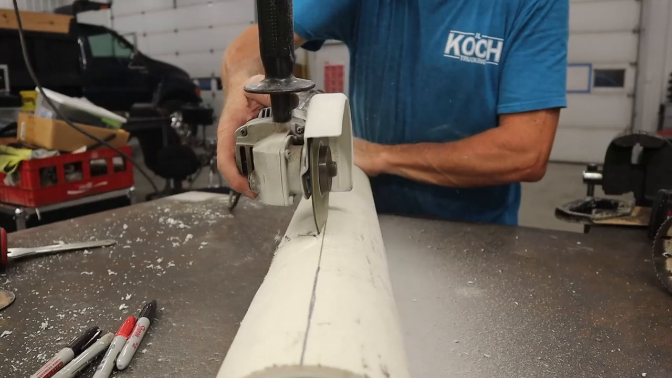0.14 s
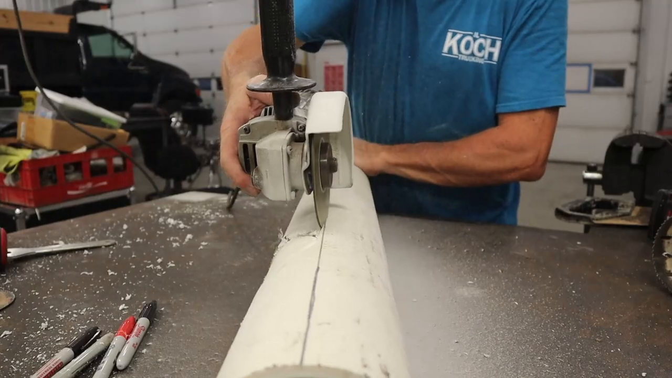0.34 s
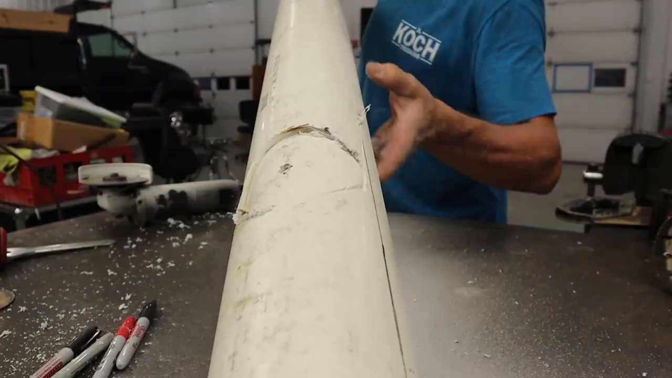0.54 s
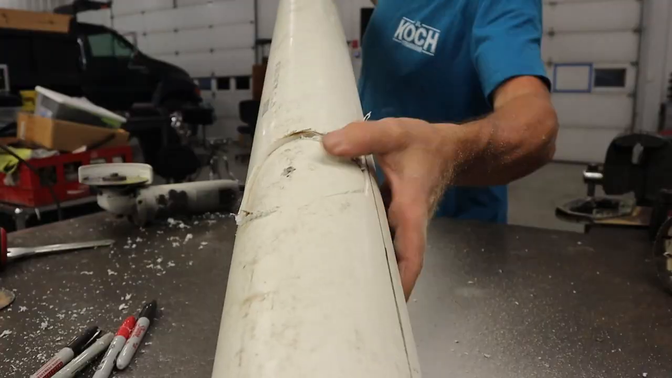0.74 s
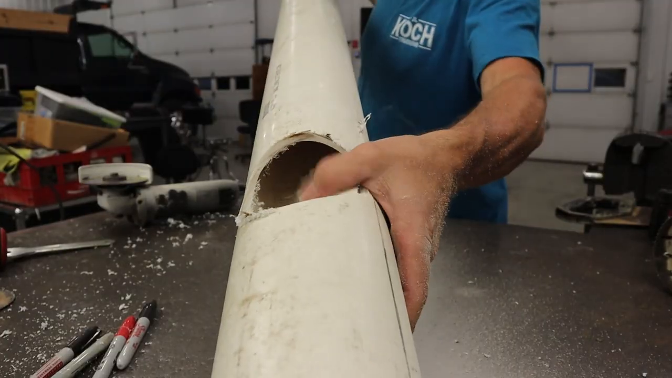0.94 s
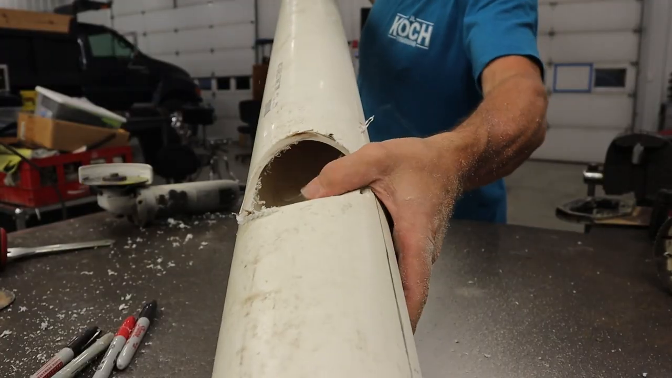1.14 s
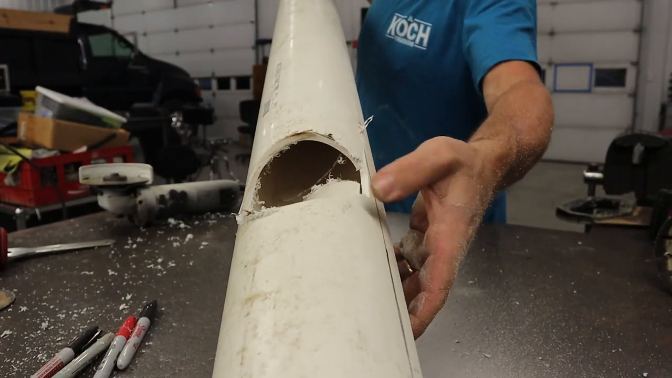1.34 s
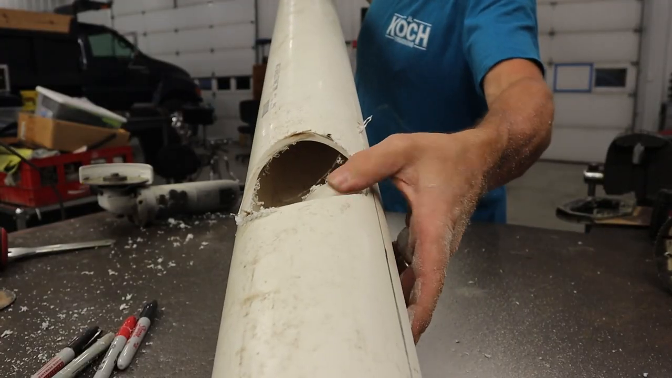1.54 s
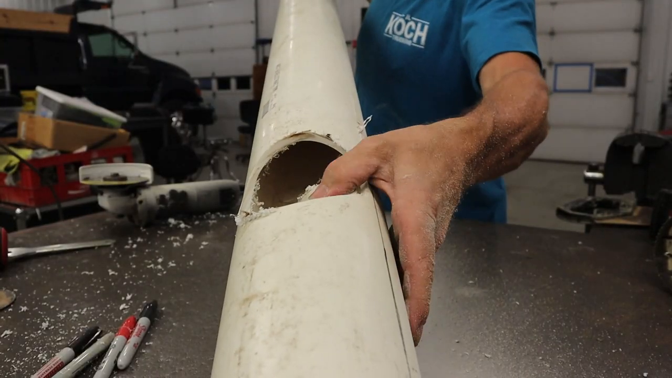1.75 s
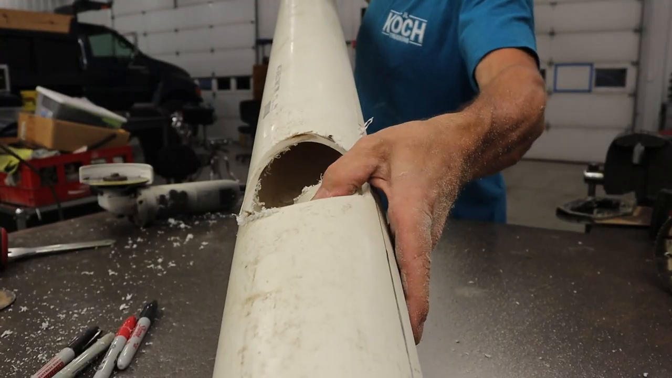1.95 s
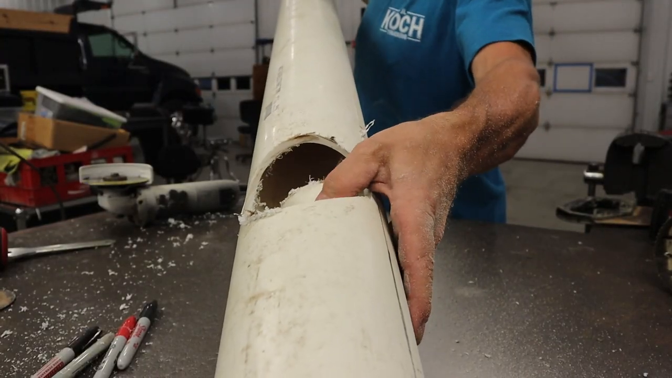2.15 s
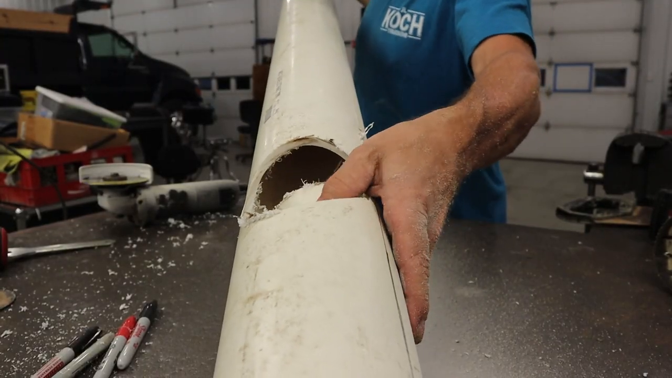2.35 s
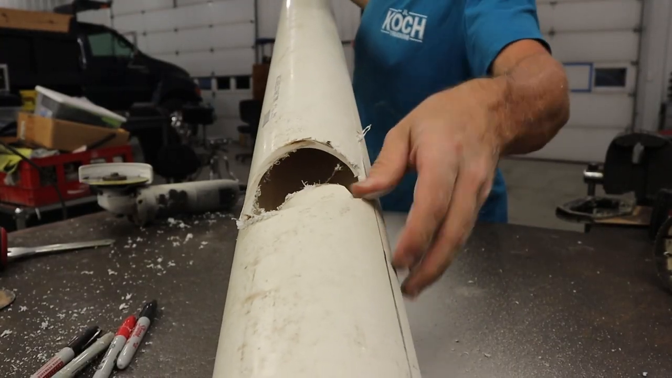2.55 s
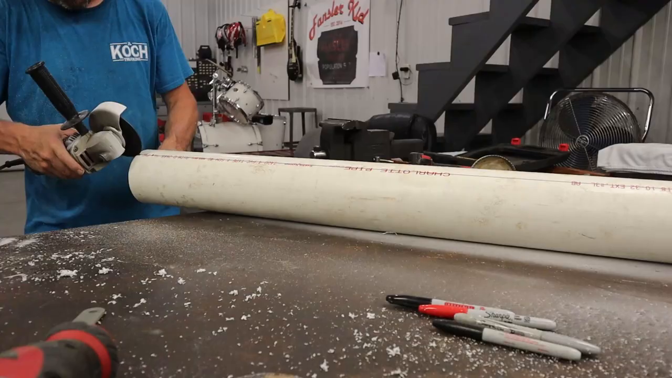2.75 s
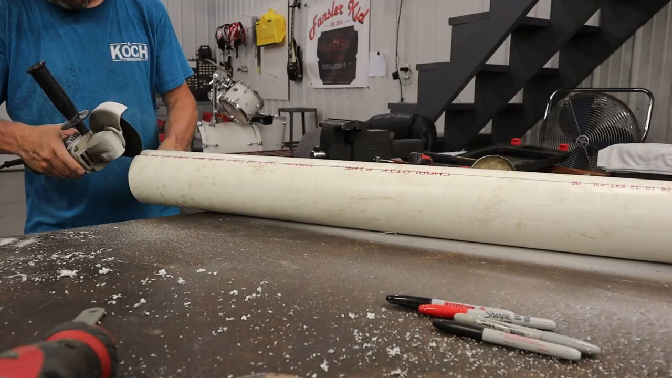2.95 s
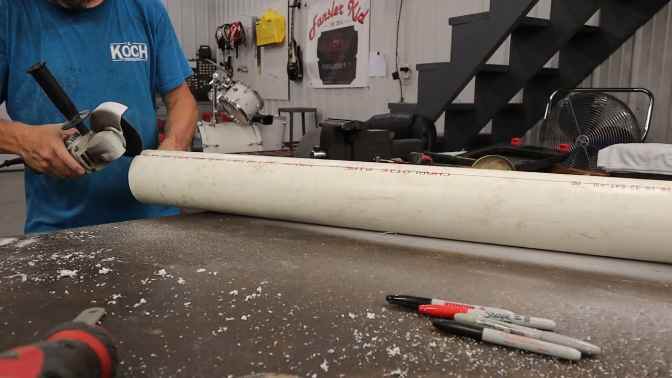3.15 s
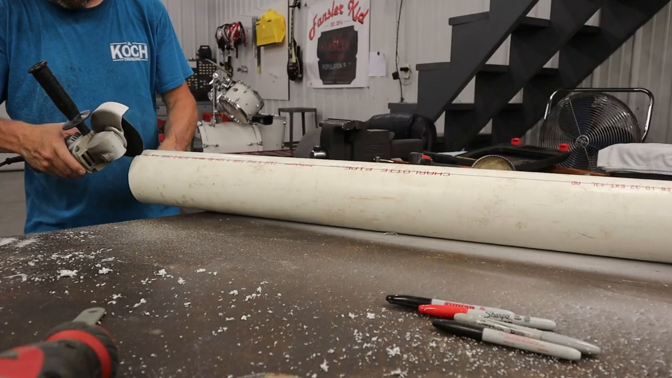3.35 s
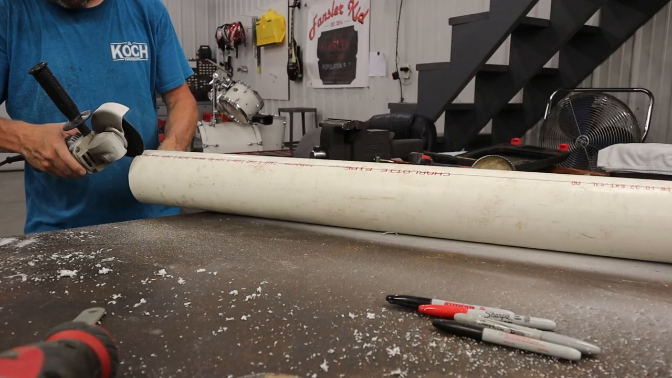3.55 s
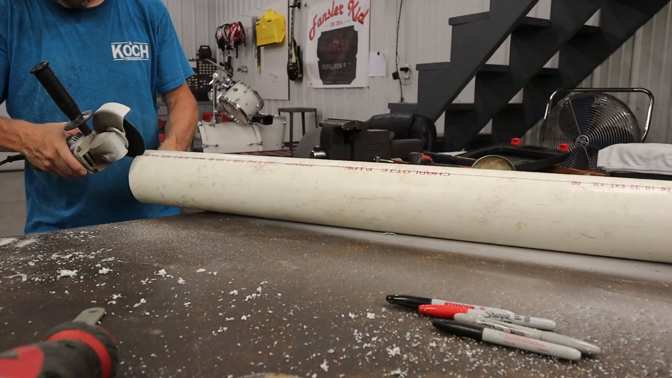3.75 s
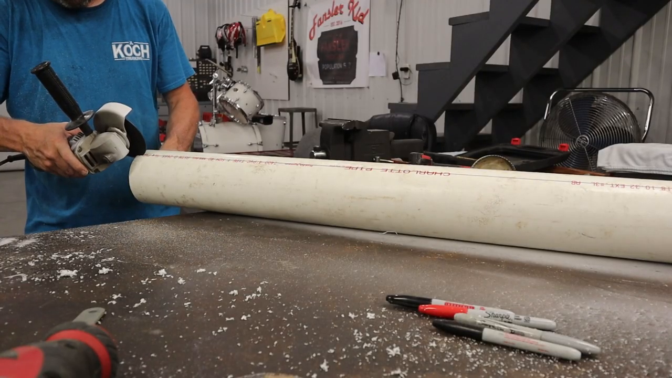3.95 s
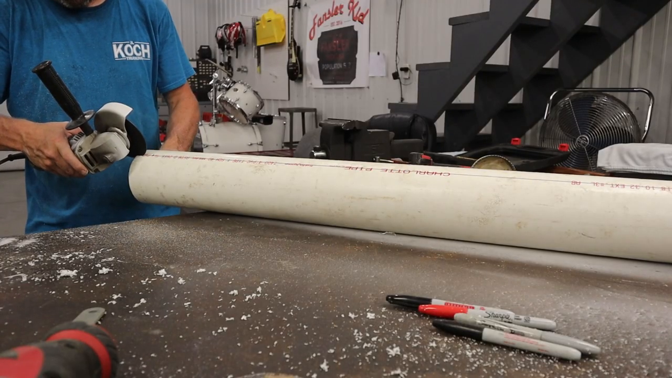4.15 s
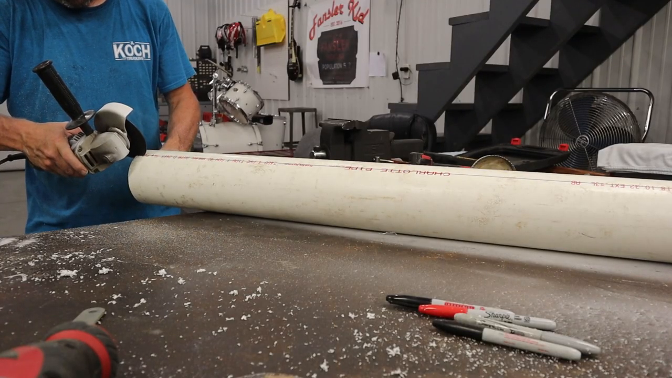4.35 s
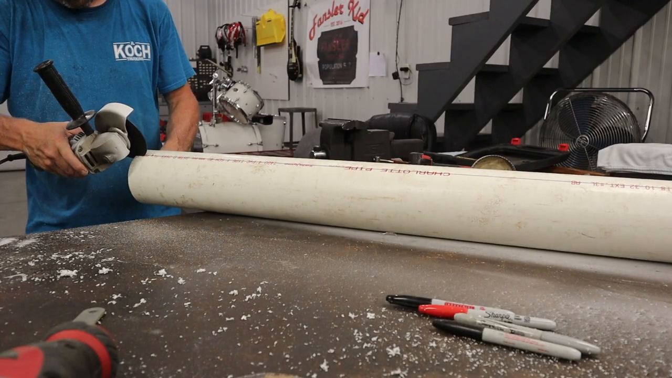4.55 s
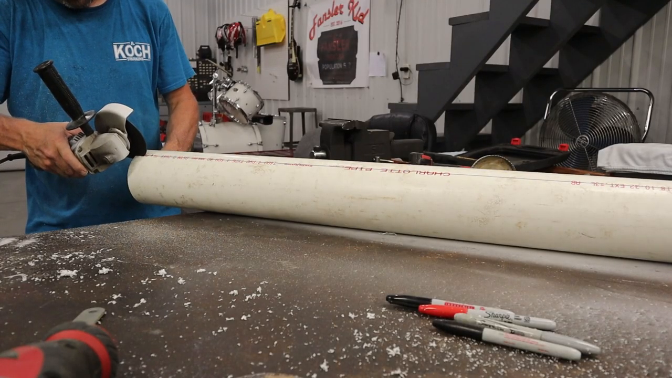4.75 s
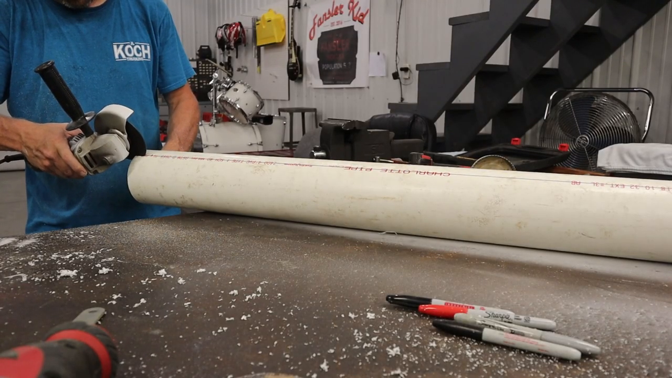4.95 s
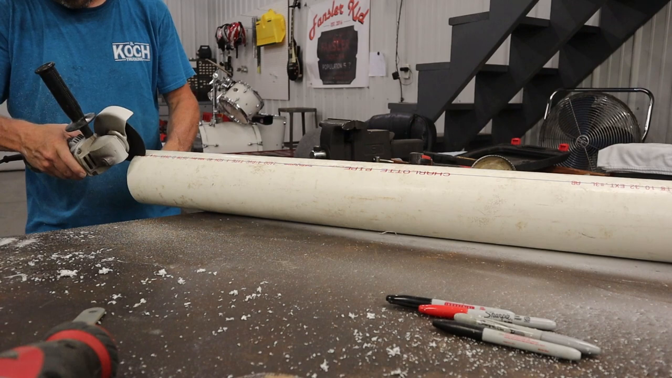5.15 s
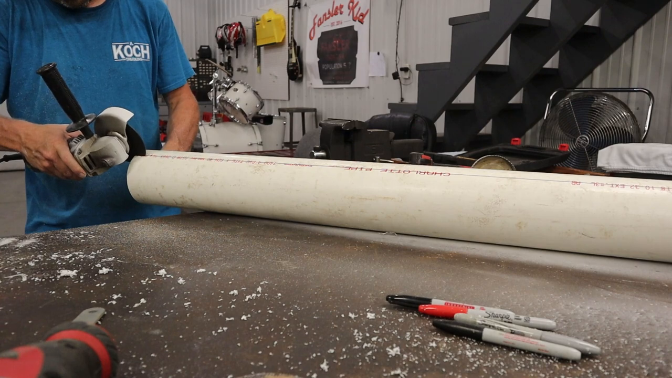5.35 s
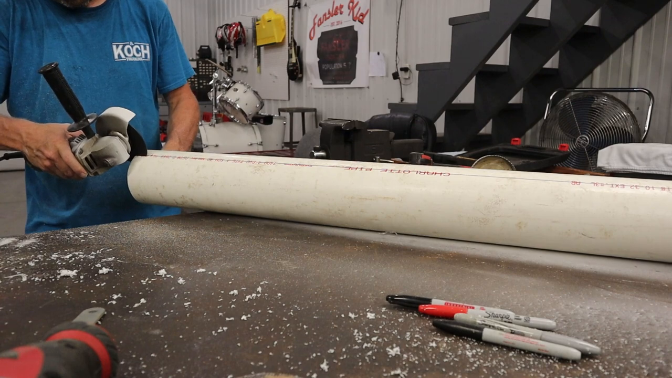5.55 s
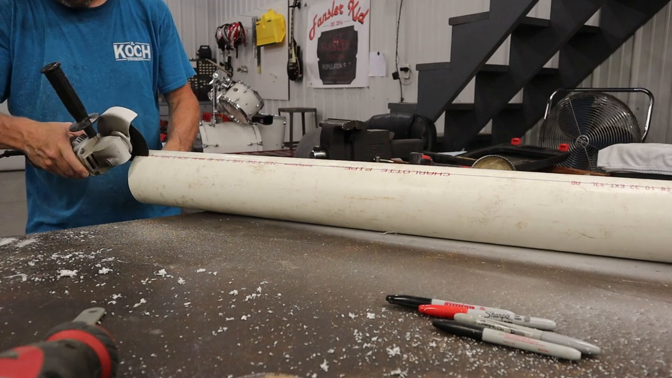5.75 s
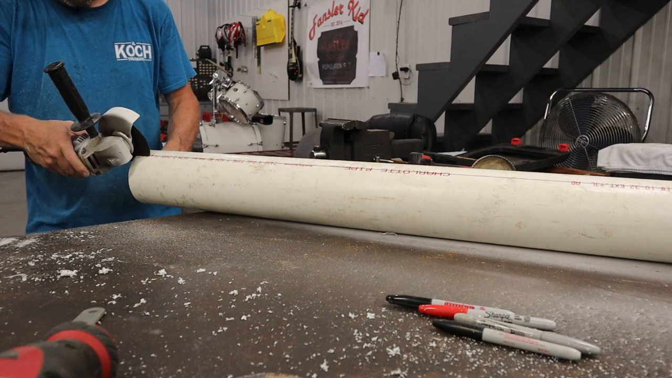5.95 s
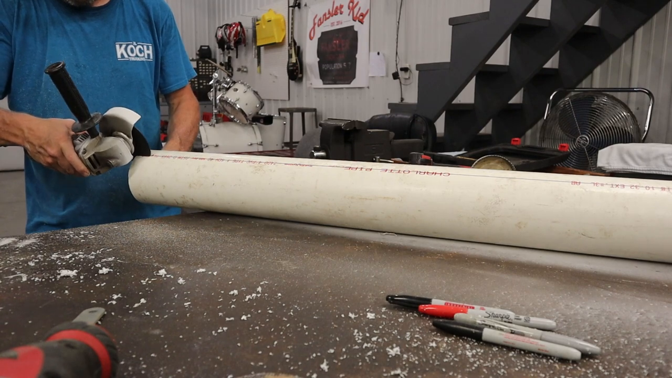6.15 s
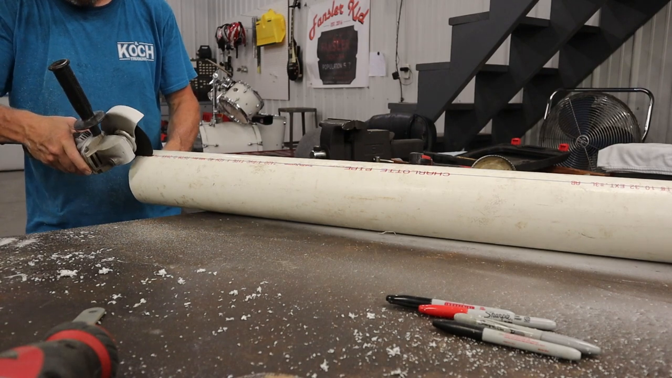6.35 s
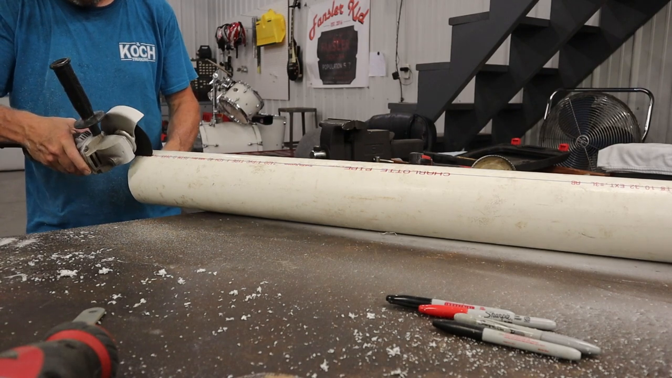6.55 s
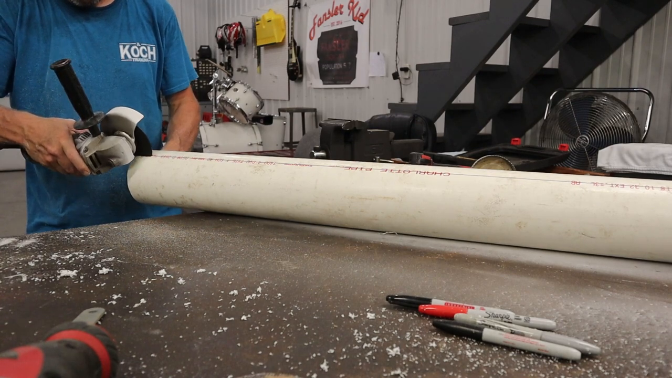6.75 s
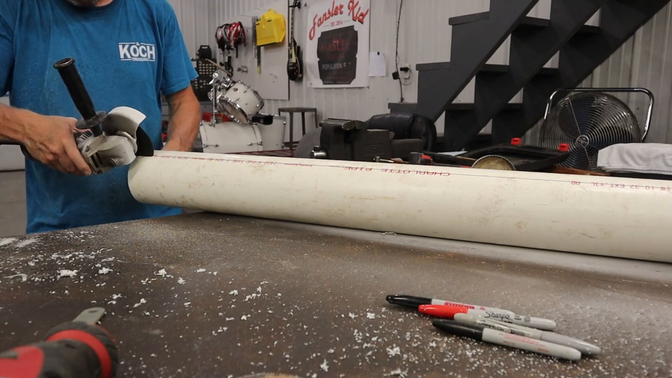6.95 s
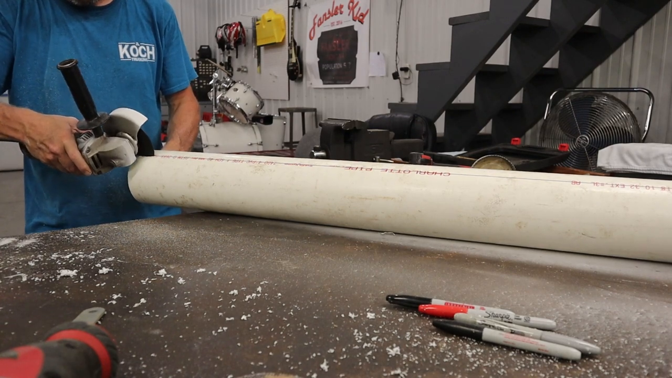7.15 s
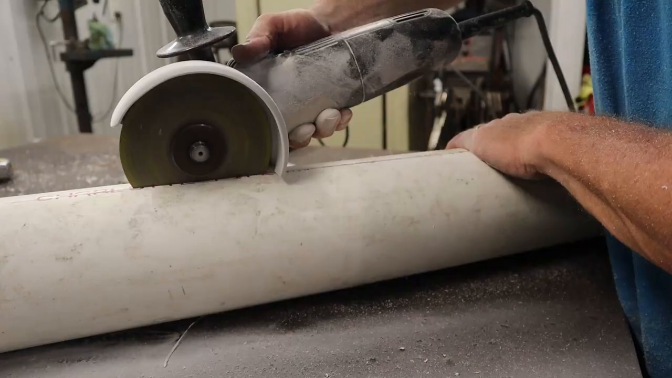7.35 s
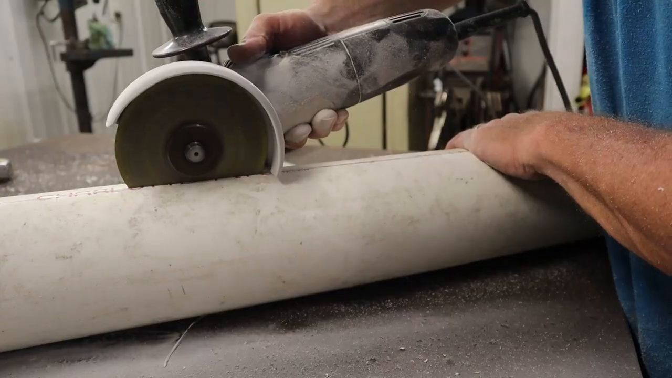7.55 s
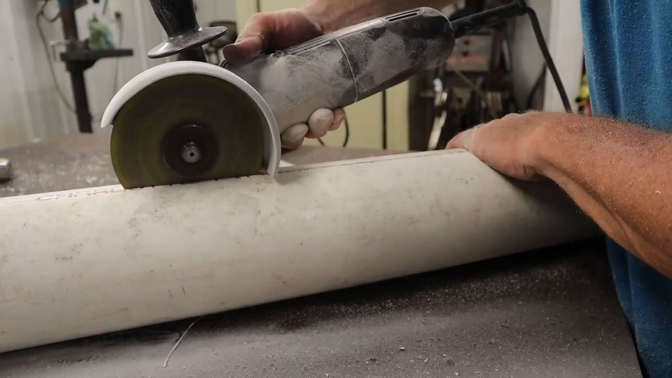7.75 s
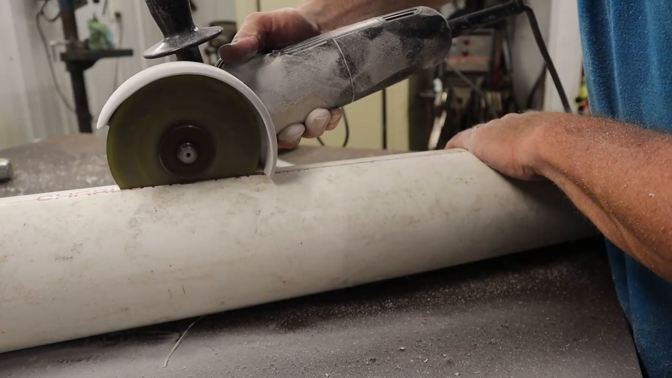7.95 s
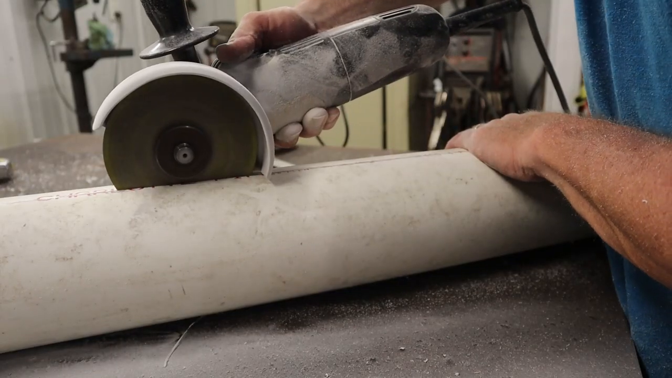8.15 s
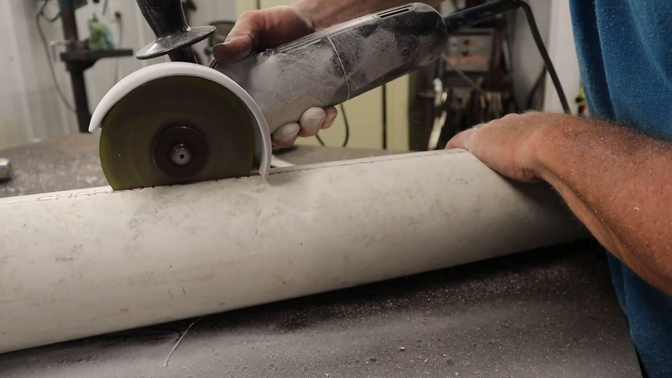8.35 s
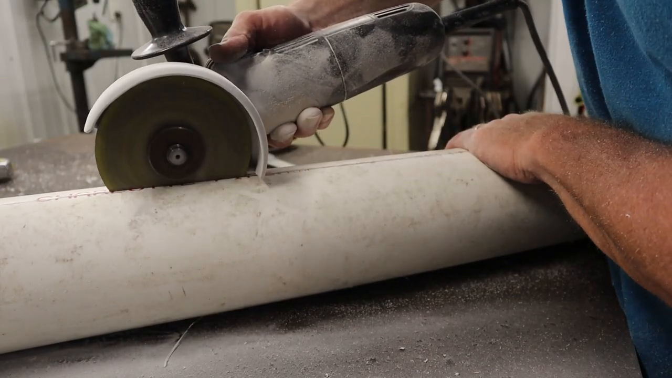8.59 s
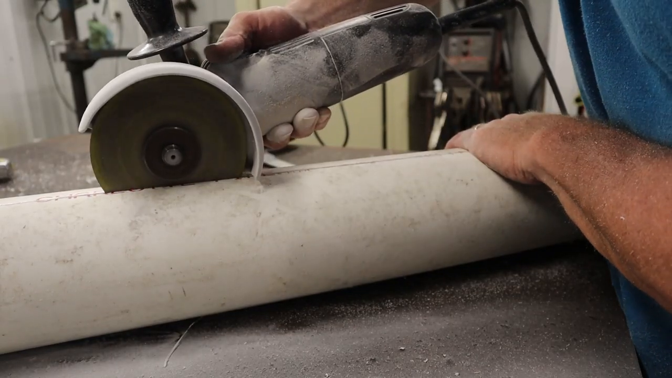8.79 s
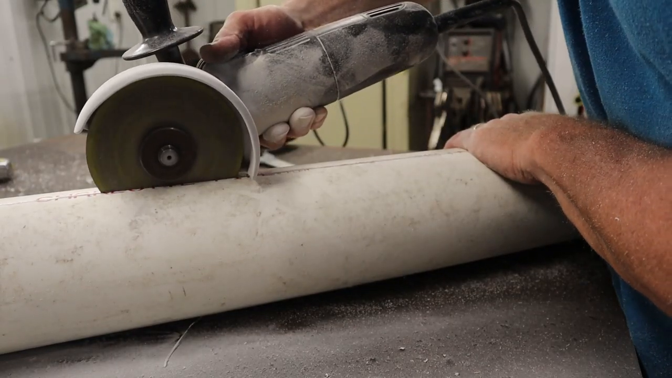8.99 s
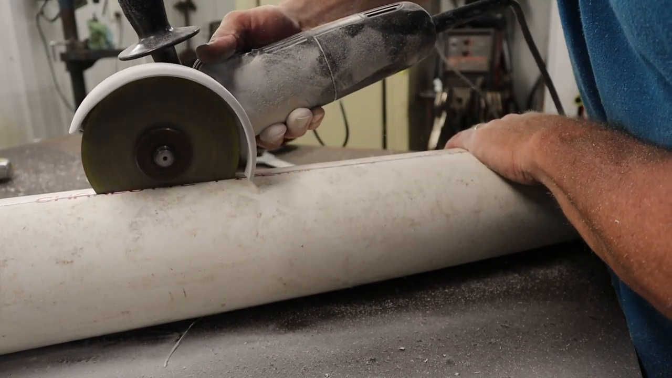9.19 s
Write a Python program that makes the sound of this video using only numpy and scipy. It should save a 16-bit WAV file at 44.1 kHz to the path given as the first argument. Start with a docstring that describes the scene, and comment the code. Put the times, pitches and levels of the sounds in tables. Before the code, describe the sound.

A grinder saws harshly into plastic pipe, rattles down on a steel bench amid sharp snaps, then bites again with wavering squeals and a closer buzz.

```python
"""Angle grinder on a plastic pipe

Four shots, hard cut: the wheel saws the pipe; the grinder rattles to a stop on a steel bench while a thumb
snaps the cut flap, rubs and knocks the pipe; the wheel bites the pipe's end and squeals; a closer cut follows.
Cuts: a rim pattern repeated each turn, chip noise and sine orders of wheel speed. Bench: filtered grains.
Flap and knock: noise cracks and decaying modes. Tear and hand: friction noise. Shop: air noise, low tones.
"""
import sys
import numpy as np
from scipy import signal
from scipy.fft import rfft, irfft, next_fast_len
from scipy.io import wavfile
from scipy.ndimage import uniform_filter1d, map_coordinates

SR = 44100
rng = np.random.default_rng(int(sys.argv[2]) if len(sys.argv) > 2 else 0)


def unload_wav(signal):
    """Save mono or channel-first audio to the path in sys.argv[1] as 16-bit WAV at rate SR, clipped to [-1, 1]."""
    wavfile.write(
        sys.argv[1],
        SR,
        np.round(np.clip(np.atleast_2d(signal).T, -1, 1) * 32767).astype(np.int16),
    )


N = 406602
T = np.arange(N) / SR

# Side against mid for hand, flap and shop air: hz, side_db
HAND_WIDTH = [(100, -13.5), (700, -4), (2000, -1), (7000, 0.5), (13000, 5)]


def amp(db):
    """Decibels to gain."""
    return 10 ** (np.asarray(db) / 20)


def unit(x):
    """Each channel at rms 1."""
    return x / np.sqrt(np.mean(x ** 2, axis=-1, keepdims=True) + 1e-20)


def along(points, hz):
    """Interpolate (hz, value) points on a log frequency axis."""
    f, v = np.transpose(points)
    return np.interp(np.log(hz + 1), np.log(f + 1), v)


def curves(rows, t):
    """Each column after the time, at the times t."""
    s, *cols = np.transpose(rows)
    return [np.interp(t, s, c) for c in cols]


def wobble(t, rate):
    """Smooth random curve, rate knots per second."""
    coarse = np.arange(0, (t[-1] - t[0]) * rate + 1, 1 / 8)
    knots = rng.standard_normal(int(coarse[-1]) + 4)
    return np.interp((t - t[0]) * rate, coarse, map_coordinates(knots, [coarse]))


def filtered(x, response):
    """x times a response of frequency."""
    n = x.shape[-1]
    m = next_fast_len(n + SR // 4)
    return irfft(rfft(x, m) * response(np.fft.rfftfreq(m, 1 / SR)), m)[..., :n]


def coloured(x, points):
    """x shaped by (hz, db) points."""
    return filtered(x, lambda hz: amp(along(points, hz)))


def in_band(x, band):
    """x scaled to rms 1 inside a band in Hz."""
    inside = filtered(x, lambda hz: (hz > band[0]) & (hz < band[1]))
    return x / inside.std(axis=-1, keepdims=True)


def stereo(pair, width):
    """Left and right from two like signals, taken as mid and side."""
    side = coloured(pair[1], width)
    return np.array([pair[0] + side, pair[0] - side])


def grains(t, rate, spread_db):
    """Random tiny impacts of uneven size, rate per second, rms 1."""
    hits = rng.random(len(t)) < rate / SR
    sizes = hits * amp(spread_db * np.minimum(rng.exponential(size=len(t)), 4))
    return unit(sizes * rng.standard_normal((2, len(t))))


def add(track, s, sound):
    """Lay a sound into a track, s seconds in."""
    part = track[..., round(s * SR):][..., :sound.shape[-1]]
    part += sound[..., :part.shape[-1]]


def room(x):
    """Workshop reverberation at two points: noise tails decaying at a rate set by frequency."""
    # Reverberation time: hz, t60_s
    room_t60 = [(150, 0.8), (1500, 0.26), (10000, 0.43)]
    hz, t, z = signal.stft(rng.standard_normal((2, SR // 2)), SR, nperseg=256)
    decay = amp(-60 * t / along(room_t60, hz)[:, None])
    tail = signal.istft(z * decay, SR, nperseg=256)[1]
    tail = tail / np.linalg.norm(tail[0])
    return signal.fftconvolve(np.atleast_2d(x), tail, axes=1)[:, :x.shape[-1]]


def cut(t, speeds, wall, colour, width, index, buzz_db, grind_db, rise_db, low_db, hiss_db, grit):
    """The uneven rim scrapes one pattern per turn over a spray of chips; levels follow wheel speed."""
    # Low wheel orders, 3.27 and 6.54 from the motor behind the gears; level at full load:
    # order (multiple of wheel speed), top_db, end_db, close_db
    order_levels = [(1, -72, -60.5, -58.5), (2, -41, -47.5, -56), (3, -55, -56, -55.5),
                    (3.27, -50, -49.5, -52), (4, -48.5, -54, -50), (5, -39.5, -48, -49.5),
                    (6, -47.5, -49, -50), (6.54, -69, -57, -98), (7, -37, -47, -46.5), (8, -51, -55, -52),
                    (9, -41, -49, -49), (10, -45, -51, -49.5), (11, -42, -54, -51), (12, -42.5, -53, -47.5),
                    (13, -40.5, -52, -45.5), (14, -49, -48.5, -46)]
    # The kerf snatches at the wheel: time_s, jitter_turns (scale of the random phase)
    snatch = [(0, .0015), (2.8, .004), (4.4, .003), (4.8, .0012), (5.3, .003), (6.2, .0035), (6.5, .006),
              (7.5, .007)]
    free_turns_per_s = 190.4  # no load
    hiss_rise_db = 0.15  # per extra turn per s

    speed, = curves(speeds, t)
    jitter_turns, = curves(snatch, t)
    faster = speed - speed.mean()
    bite = np.clip((free_turns_per_s - speed) / 7, .1, 1)  # load slows the wheel and brings out its lines
    turns = np.cumsum(speed) / SR + jitter_turns * (wobble(t, 35) + 0.27 * wobble(t, 130))

    # Rim pattern: harmonics 15 to 99 of the turn, random phases
    rim = irfft(np.exp(2j * np.pi * rng.random((2, 100))) * (np.arange(100) > 14), 2048)
    buzz = unit(np.array([np.interp(turns % 1, np.linspace(0, 1, len(r)), r) for r in rim]))
    buzz = unit(buzz + 1.1 * room(buzz))
    buzz = coloured(buzz, [(1500, -1.5), (4500, 0.0), (8000, -4.0), (14000, 5.0)])

    contact = 1 + 0.059 * np.cos(2 * np.pi * turns)  # the wheel runs a little out of true
    noise = rng.standard_normal((2, len(t)))
    chips = unit(contact * (noise + grit * grains(t, 4000, spread_db=1.1)))
    chips = coloured(chips, [(300, low_db), (900, low_db / 2), (2000, 0)])
    chips = chips * amp(0.84 * wobble(t, 45))

    scrape = amp(buzz_db) * bite * unit(patchy(buzz, depth_db=2.5, size=16))
    scrape = scrape + patchy(chips, depth_db=2.1, size=8)
    scrape = in_band(coloured(scrape, colour), (1300, 6000))
    spray = filtered(scrape, lambda hz: 1 - 1 / (1 + (hz / 6300) ** 8))
    body = amp(grind_db + rise_db * faster) * (scrape - spray)
    hiss = amp(hiss_db + hiss_rise_db * faster) * unit(spray)
    sound = amp(presses(t)) * (body + hiss)

    gains = {row[0]: bite ** 3 * amp(row[1 + index]) for row in order_levels}
    for order, ring in [*song(speed, wall, count=38).items(), *squeals(t).items()]:
        gains[order] = np.hypot(gains.get(order, 0), ring)
    for order, gain in gains.items():
        sound += gain * line(t, turns, order, waver_db=1.3)
    return stereo(sound, width)


def line(t, turns, order, waver_db):
    """One wheel order: a sine near rms 1, wavering as the tool moves in the hands."""
    phase = order * turns + rng.random()
    leads = [0, 1 / 4 + .04 * wobble(t, 4)]  # side leads mid, so it reaches the left first

    def tone(lead):
        return np.sqrt(2) * amp(waver_db * wobble(t, 9)) * np.sin(2 * np.pi * (phase + lead))

    return np.array([tone(lead) for lead in leads])


def patchy(x, depth_db, size):
    """Random slow level changes across narrow frequency bands, which make the sound uneven."""
    z = signal.stft(x, nperseg=1024)[2]
    field = uniform_filter1d(rng.standard_normal(z.shape[1:]), size=3, axis=0)  # over frequency
    field = uniform_filter1d(field, size=size, axis=1)  # over time
    return signal.istft(z * amp(depth_db * field / field.std()), nperseg=1024)[1][:, :x.shape[1]]


def presses(t):
    """Gaussian swells and dips, in dB added to the grinding as the wheel bears harder or glides."""
    # Bearing on the kerf; negative is a glide: centre_s, half_length_s, grinding_change_db
    press_events = [(4.3, 0.14, 1.4), (4.92, .2, -0.8), (6.25, .1, 1.2), (6.45, .04, 1.5), (6.58, .03, 2),
                    (6.7, .035, 2), (7.494, 0.022, 2.2), (7.7, .03, 1.5), (8.49, .015, 2), (8.62, .02, 1.8),
                    (8.748, .025, 2.5), (8.876, .02, 2)]
    return sum(db * np.exp(-((t - s) / half) ** 2) for s, half, db in press_events)


def song(speed, wall, count):
    """Gain of each wheel order as it slides over the pipe wall's resonances."""
    audible_db = -54  # orders that never ring above this stay silent
    hz = np.arange(0, SR / 4, 2)
    response = np.zeros(len(hz))
    for centre, width, db in wall:
        response = response + amp(db) / (1 + (2 * (hz - centre) / width) ** 2)

    def loudest(k):
        return response[(hz > k * speed.min()) & (hz < k * speed.max())].max()

    orders = [k for k in range(2, count) if loudest(k) > amp(audible_db)]
    return {k: np.interp(k * speed, hz, response) for k in orders}


def squeals(t):
    """Gain of each order that squeals as the wheel grabs the kerf: it swells, holds and dies away."""
    # Squeals: hold_start_s, hold_end_s, order (multiple of wheel speed), level_db,
    # rise_s (over 20 dB), fall_s (over 20 dB)
    squeal_events = [(2.85, 3.53, 20, -42, .1, .15), (3.67, 3.77, 21, -39.5, .06, .08),
                     (3.62, 3.78, 18, -38.5, .1, .1), (3.97, 4.13, 7, -38.5, .12, .15),
                     (4.24, 4.45, 19, -37, .04, .08), (4.3, 4.66, 13, -43.5, .1, .1),
                     (4.35, 4.55, 7, -37.5, .15, .1), (4.6, 4.9, 19, -39.5, .1, .1),
                     (4.6, 4.75, 25, -45, .3, .2), (4.63, 4.69, 23, -43, .1, .2),
                     (4.7, 5.06, 7, -28.5, .17, .58), (4.75, 4.93, 20, -32.8, .3, .13),
                     (4.72, 5.0, 18, -38, .2, .15), (4.96, 5.1, 16, -40.5, .2, .1),
                     (5.26, 5.31, 22, -40, .1, .08), (5.6, 5.98, 19, -42, .1, .1),
                     (5.6, 6.1, 14, -45, .2, .15), (6.03, 6.19, 7, -39, .12, .15),
                     (6.08, 6.24, 18, -42.5, .1, .08), (6.13, 6.23, 26, -44, .1, .08),
                     (6.2, 6.23, 13, -41, .05, .06), (6.35, 6.53, 7, -36, .08, .15),
                     (6.565, 6.59, 10, -37.5, .08, .04), (6.565, 6.59, 12, -37.5, .08, .04),
                     (6.68, 6.71, 12, -35.5, .04, .06), (6.695, 6.72, 16, -39, .04, .04),
                     (7.1, 7.23, 7, -40.5, .15, .12)]
    gains = {}
    for start, end, order, db, rise, fall in squeal_events:
        if t[0] < start < t[-1]:
            away = np.maximum((start - t) / rise, 0) + np.maximum((t - end) / fall, 0)
            gains[round(order)] = np.maximum(gains.get(round(order), 0), amp(db - 20 * away))
    return gains


def coasting(t):
    """Slack gears chatter and the hopping grinder drums on the bench until the wheel stands still."""
    # The body's hardest hops: time_s, relative_level_db
    clacks = [(0.472, -21), (0.4905, -15), (0.5492, -16), (0.607, -21), (0.627, -21), (0.668, -18),
              (0.689, -15), (0.7672, -16), (0.7844, -15.5), (0.832, -16.5), (0.8989, -16.5), (0.9244, -19),
              (0.9582, -17), (0.976, -20), (1.0111, -17), (1.5444, -25), (1.5863, -23)]
    # Bench plate modes: centre_hz, width_hz, relative_level_db
    bench_modes = [(123, 7.7, -19), (240, 41, -14), (341, 28, -6.5), (451.7, 12, 1), (555, 35, -5),
                   (681, 40, -4), (777, 26, -1), (821, 16, 1.5), (853, 22, -1.5), (897, 24, -.5),
                   (945, 22, 2.5), (1070, 70, -12), (1200, 14, -4)]
    # Colour of the gear rattle: hz, db_per_hz
    casing_colour = [(500, -15), (900, 2.5), (1300, -3), (2250, 2), (2540, -5), (2740, 6), (2900, -2),
                     (3200, -11), (3550, -3.5), (4300, -12), (4620, -9), (4800, -2.5), (5000, -13),
                     (7000, -21), (11500, -28), (14500, -57)]
    # Side against mid: hz, side_db
    bench_width = [(60, -12), (110, -12), (200, -29), (380, -8), (700, -9), (1290, -2), (2380, -0.5),
                   (4400, 5), (8120, 6), (15000, 11)]
    stop_s, bend = 2.02, 3.0
    drone_db, drone_fall = -32.6, 0.62  # fall: power of the dying speed
    rattle_db, rattle_fall = -34.7, 1.05
    flutter_db = 1.5  # quick uneven flurries

    spin = 1 - np.clip((t - t[0]) / (stop_s - t[0]), 0, 1) ** bend
    hops, age = np.zeros(len(t)), np.arange(SR // 10) / SR
    for s, db in clacks:
        hop = amp(db - 9.7) * (1 - np.exp(-age / 0.002)) * amp(-60 * age / 0.05)
        add(hops, s - t[0] - .003, hop)
    chatter = unit(grains(t, 900, spread_db=0.5) + 1.64 * rng.standard_normal((2, len(t))))
    rattle_gain = amp(rattle_db + flutter_db * wobble(t, 80)) * spin ** rattle_fall + hops
    rattle = in_band(coloured(chatter, casing_colour), (1500, 6000)) * rattle_gain

    def plate(f):
        return sum((-1) ** k * amp(db) * 1j * f * w / (c * c - f * f + 1j * f * w)
                   for k, (c, w, db) in enumerate(bench_modes))

    rocking = amp(0.6 * wobble(t, 45))
    drumming = in_band(filtered(grains(t, 1500, spread_db=0.5), plate), (700, 1100))
    drone = drumming * rocking * amp(drone_db) * spin ** drone_fall
    return stereo(rattle + drone, bench_width)


def snaps_and_knock(t):
    """Cracks, treble first as along the pipe wall, over thumps in modes near each blow's favoured pitch."""
    # Flap snaps near 1.03 to 1.13 s, then a knock on the pipe near 2.35 s:
    # time_s, crack_relative_db, thump_relative_db, favoured_hz (most excited)
    blows = [(1.033, -21, -16.5, 555), (1.0425, -27, -19, 555), (1.0517, -32, -18, 620),
             (1.0647, 5.7, -10, 230), (1.0688, -18, -15, 690), (1.0762, -20, -5, 460),
             (1.125, -23, -19.5, 330), (2.344, -18, -42, 555), (2.354, -12.5, -33, 555),
             (2.362, -26, -37, 555)]
    # Thump modes: pitch_hz, relative_level_db, t60_s
    thump_modes = [(55.3, -5.5, 0.84), (170, -7, 0.24), (312, 0, 0.14), (436, 1, 0.1), (555, 1.5, 0.075),
                   (690, 0, 0.04)]
    # Colour of the cracks: hz, level_db
    crack_colour = [(200, -22), (900, 0.5), (2000, -5), (3000, 2.5), (4500, 1.5), (5800, -9), (8000, -3),
                    (11000, -3.5), (15000, -21)]
    # Burrs break: time_s, relative_level_db
    burr_ticks = [(1.9275, -31), (2.0647, -35), (2.145, -33), (2.179, -35), (2.2533, -35), (2.3181, -31),
                  (2.383, -32), (2.442, -33)]
    focus_db_per_octave = 21  # weakening of a mode away from the favoured pitch, 14 dB at most

    cracks, thumps, age = np.zeros((2, len(t))), np.zeros(len(t)), np.arange(SR // 2) / SR
    for s, crack_db, thump_db, favoured_hz in blows:
        splinters = 0.2 * rng.standard_normal((2, len(age))) * amp(-60 * age / 0.022)
        splinters[0, 0] += 2.8  # sharp onset
        add(cracks, s - t[0], amp(crack_db) * splinters)
        ring = np.zeros(len(age))
        for hz, db, t60 in thump_modes:
            loss_db = min(focus_db_per_octave * abs(np.log2(hz / favoured_hz)), 14)
            ring += amp(db - loss_db - 60 * age / t60) * np.sin(2 * np.pi * hz * age)
        add(thumps, s - t[0], amp(thump_db) * ring * (1 - np.exp(-age / 0.0011)))
    for s, db in burr_ticks:
        tick = rng.standard_normal((2, len(age))) * amp(-60 * age / 0.012)
        add(cracks, s - t[0], amp(db + 0.5) * tick)

    def travel(hz):
        bending = np.exp(-2j * np.pi * (.36 * np.sqrt(hz) - .0016 * hz))  # delay falls as 1 / sqrt(hz)
        return amp(along(crack_colour, hz)) * bending

    direct = filtered(cracks, travel)
    direct[0] += thumps
    return stereo(direct + amp(-12.5) * room(direct[0]), HAND_WIDTH)


def tear_and_rubbing(t):
    """Friction noise in strokes that swell and let go: a tearing rustle, then skin on the dusty pipe."""
    # Hand strokes, and first a soft tearing rustle of the flap:
    # peak_s, peak_db, rise_s (over 20 dB), fall_s (over 20 dB)
    friction_strokes = [(1.03, -36, .03, .02), (2.15, -50, .07, .27), (2.358, -36, .008, .035),
                        (2.645, -40, .33, 0.05)]
    # Colour of the friction: hz, db_per_hz
    skin_colour = [(300, -1), (550, 8), (1000, 2.5), (1800, -4), (2600, -2), (4500, 1.5), (7000, -6),
                   (12000, -9), (15000, -29)]
    grip_db = -60  # the resting hand shifts between strokes

    strokes = sum(amp(db - 20 * np.maximum((s - t) / rise, (t - s) / fall))
                  for s, db, rise, fall in friction_strokes)
    friction = rng.standard_normal((2, len(t))) + grains(t, 3000, spread_db=1.5)
    friction = friction * amp(1.2 * wobble(t, 110))  # skin sticks and slips
    grip = amp(grip_db) * np.clip((t - 1.85) / 0.078, 0, 1)
    rub = in_band(coloured(friction, skin_colour), (3000, 13000))
    return stereo(rub * np.hypot(strokes, grip), HAND_WIDTH)


def puffs():
    """Soft low thuds under the grinding, each a few slow cycles in a smooth window."""
    # Thuds: peak_s, relative_level_db
    thuds = [(3.517, -67), (6.589, -64), (6.799, -62), (6.868, -62), (7.817, -53), (8.309, -52),
             (8.439, -52), (8.619, -52), (9.018, -45)]
    track, age = np.zeros(N), np.arange(SR // 25) / SR
    for s, db in thuds:
        cycles = np.sin(2 * np.pi * rng.uniform(70, 110) * age)
        add(track, s - .008, amp(db + 2) * np.hanning(len(age)) * cycles)
    return track


def shop(t):
    """Ventilation as coloured noise; faint low tones ringing in the bench as slowly wavering sines."""
    # Colour of the air noise: hz, db_per_hz
    air_colour = [(21, -45), (35, -9), (101, -14.5), (243, -0.5), (287, -7), (333, -11), (417, -7),
                  (594, -13.5), (2440, -25), (3000, -24), (3900, -65), (6600, -120)]
    # Faint low tones ringing in the bench: pitch_hz, relative_level_db
    low_tones = [(119.5, -51.5), (178, -62), (249, -55.5), (544, -62)]
    air = amp(-45.3) * unit(coloured(rng.standard_normal((2, len(t))), air_colour))
    tones = sum(amp(db + 0.5 + 1.7 * wobble(t, 4.16)) * np.sin(2 * np.pi * hz * t) for hz, db in low_tones)
    return stereo(air, HAND_WIDTH) + tones


def scene():
    """Four shots, butted together, with the thuds laid over."""
    # Shot boundaries: time_s
    edits = [0.447, 2.783, 7.38]
    # Wheel speed in each cut: time_s, turns_per_s
    top_speed = [(0.0, 140.0), (0.09, 140.15), (0.18, 140.5), (0.27, 141.45), (0.36, 143.6), (0.45, 144.9)]
    end_speed = [(2.78, 186.2), (3.05, 185.2), (3.6, 180.6), (4, 174.5), (4.6, 166.4), (4.8, 164.3),
                 (5.0, 163.5), (5.15, 164.0), (5.45, 167.3), (5.65, 168.4), (5.9, 168.3), (6.21, 167.2),
                 (6.34, 164.8), (6.7, 162.3), (6.85, 159.3), (7.05, 157.7), (7.38, 159.2)]
    close_speed = [(7.38, 155.1), (7.5, 155.1), (7.64, 152.0), (8.3, 157.7), (8.52, 157.9), (8.68, 159.6),
                   (8.88, 156.7), (9.22, 157.2)]
    # Pipe wall resonances in each cut: centre_hz, width_hz, level_db
    top_wall = [(1690, 40, -43), (3450, 80, -47), (4750, 200, -47), (5060, 80, -45)]
    end_wall = [(333, 20, -50), (358.6, 11.5, -45.5), (536.4, 14, -46), (717, 27, -46), (822, 50, -45),
                (1009, 13, -47), (1190, 60, -48), (1475, 25, -45.5), (1615, 35, -45), (1960, 25, -46),
                (3030, 30, -48), (3205, 50, -46), (3690, 53, -47), (4550, 60, -51), (4710, 50, -51)]
    close_wall = [(316.5, 11.6, -44), (618.4, 35, -41.5), (3160, 60, -50), (4307, 47, -47),
                  (4460, 81, -42.5), (5600, 130, -50)]
    # Colour of the grinding in each cut: hz, db_per_hz
    top_colour = [(40, -43), (150, -25), (400, -15.5), (1000, -9.5), (1700, -5.5), (2700, -2), (4100, -8),
                  (5100, -4), (6200, -11.5), (9000, -13), (11500, -18), (15000, -36)]
    end_colour = [(70, -50), (130, -28), (250, -18), (380, -11.5), (600, -6.5), (1000, -5.5), (2200, -5.5),
                  (3150, -1), (4100, -7.5), (5500, -8), (7800, -12), (11200, -17), (14500, -73)]
    close_colour = [(30, -32), (100, -18.5), (300, -10), (600, -10), (1400, -8), (2400, -4.5), (3150, 2.5),
                    (3900, -8.5), (5500, -10), (6800, -13.5), (8500, -9), (11200, -10.5), (12800, -21),
                    (14500, -58)]
    # Side against mid in each cut: hz, side_db
    top_width = [(150, -20), (400, -13), (1000, -10.5), (1700, -3), (2700, -1), (4100, -1), (5100, 0),
                 (6200, 1), (9000, 2), (11500, 3), (15000, 4)]
    end_width = [(130, -27), (250, -25), (380, -14.5), (600, -9.5), (1000, -4.5), (2200, -0.5), (3150, 4),
                 (4100, 6), (5500, 4.5), (7800, 5.5), (11200, 11), (14500, 47)]
    close_width = [(100, -12), (300, -9), (600, -7), (1400, -1), (2400, -1.5), (3150, 2), (3900, 3.5),
                   (5500, 3), (6800, 5), (8500, 4), (11200, 6), (14500, 26)]

    top_t, bench_t, end_t, close_t = np.split(T, [round(s * SR) for s in edits])
    top = cut(top_t, top_speed, top_wall, top_colour, top_width, index=0, buzz_db=1.2,
              grind_db=-28.6, rise_db=.55, low_db=0.5, hiss_db=-39.2, grit=0.32)
    bench = coasting(bench_t) + snaps_and_knock(bench_t) + tear_and_rubbing(bench_t) + shop(bench_t)
    end = cut(end_t, end_speed, end_wall, end_colour, end_width, index=1, buzz_db=0.2,
              grind_db=-31.1, rise_db=0.085, low_db=-1, hiss_db=-38.5, grit=0.43)
    close = cut(close_t, close_speed, close_wall, close_colour, close_width, index=2, buzz_db=-3.2,
                grind_db=-29.0, rise_db=-0.04, low_db=1, hiss_db=-37, grit=0.58)
    return puffs() + np.hstack([top, bench, end, close])


def record(dry):
    """Shed deep rumble, clip at full scale, then keep nothing above the band limit."""
    top_hz = 15500
    highpass = signal.butter(4, 45, "highpass", fs=SR, output="sos")
    thinned = signal.sosfilt(highpass, dry)
    return filtered(np.clip(thinned, -1, 1), lambda hz: hz < top_hz)


dry = scene()
out = record(dry)
unload_wav(out)
```